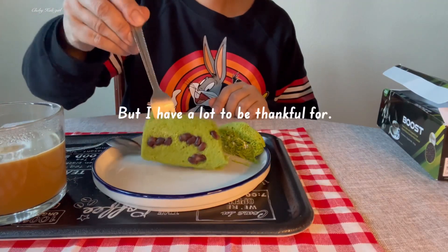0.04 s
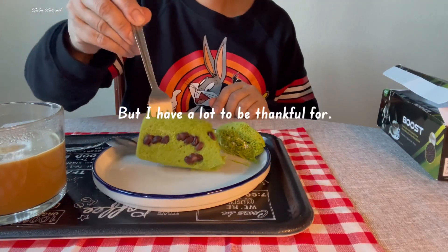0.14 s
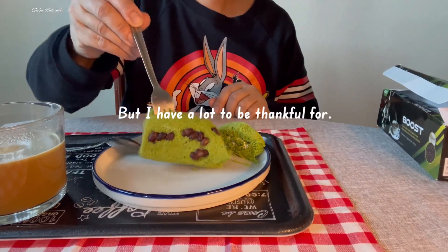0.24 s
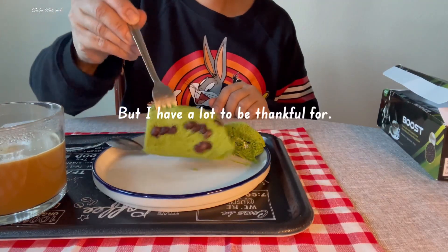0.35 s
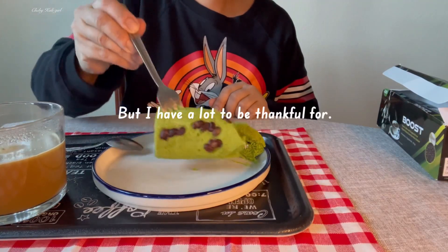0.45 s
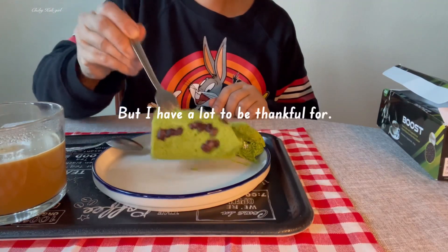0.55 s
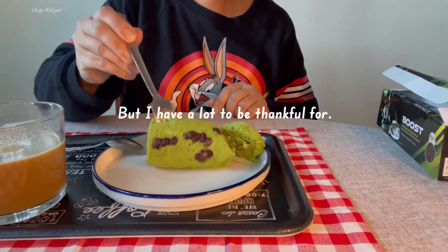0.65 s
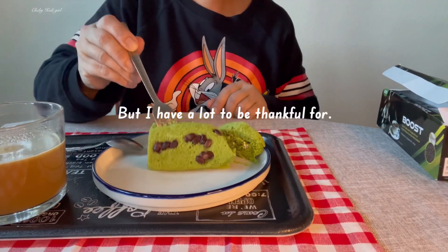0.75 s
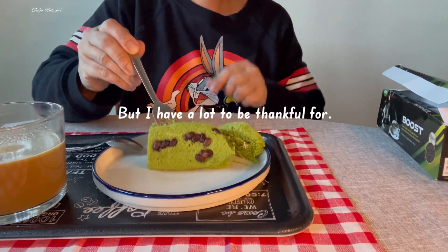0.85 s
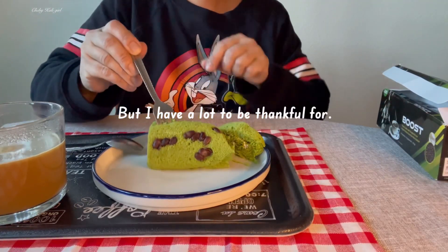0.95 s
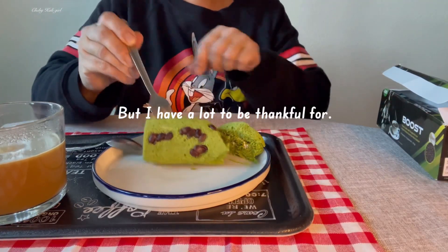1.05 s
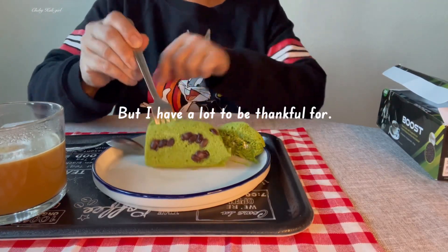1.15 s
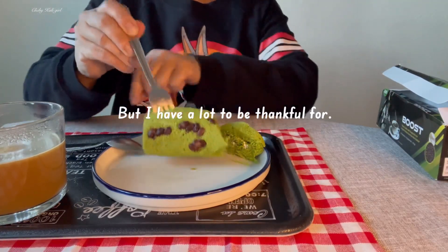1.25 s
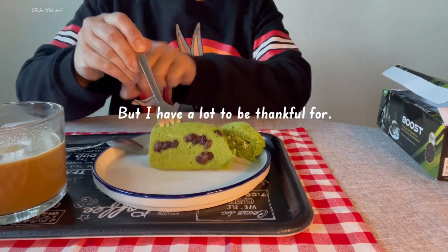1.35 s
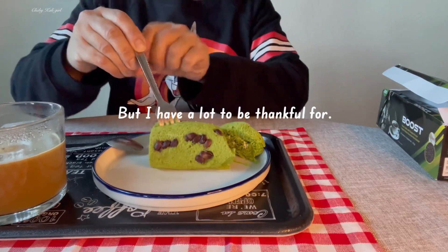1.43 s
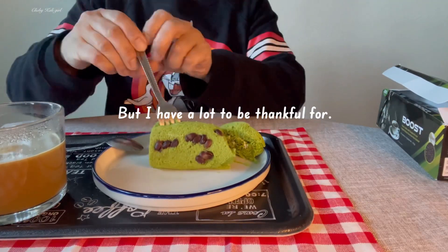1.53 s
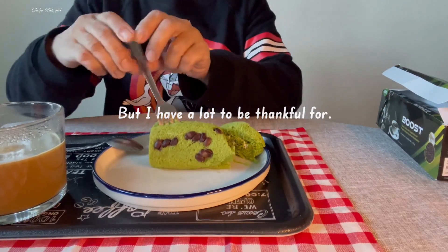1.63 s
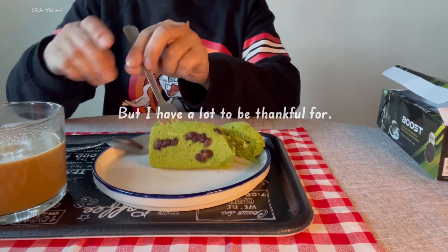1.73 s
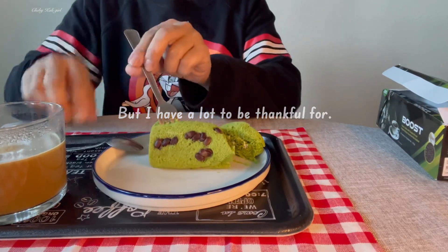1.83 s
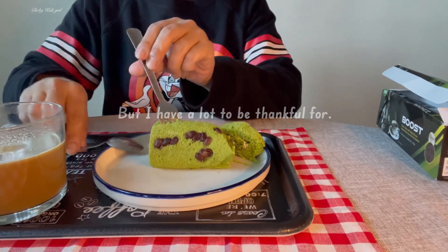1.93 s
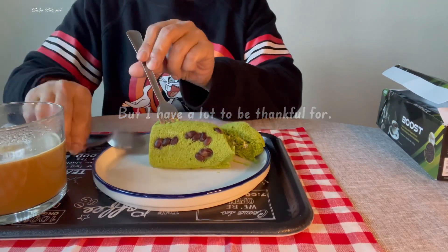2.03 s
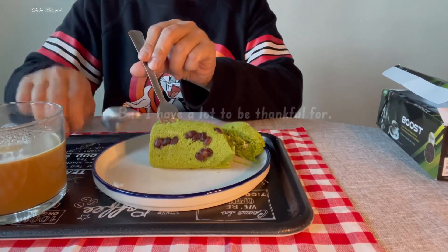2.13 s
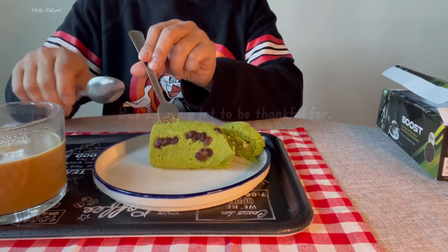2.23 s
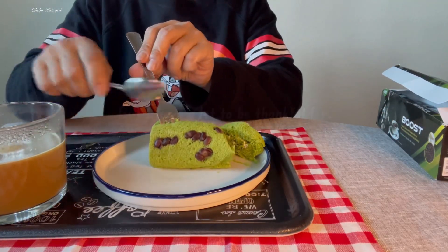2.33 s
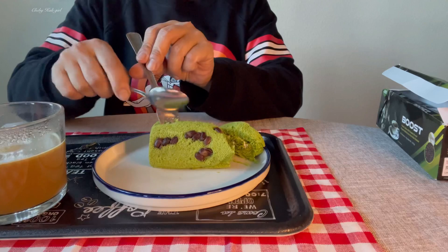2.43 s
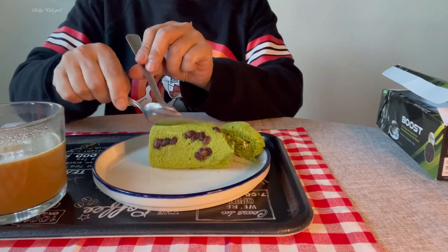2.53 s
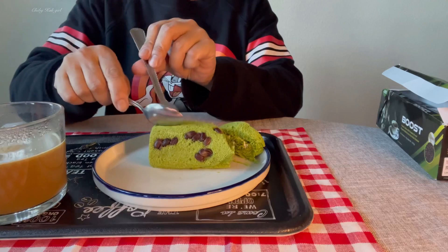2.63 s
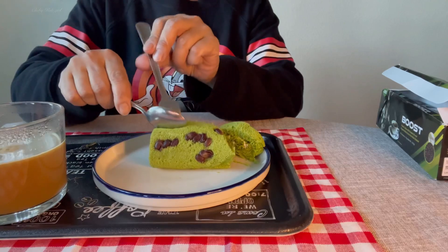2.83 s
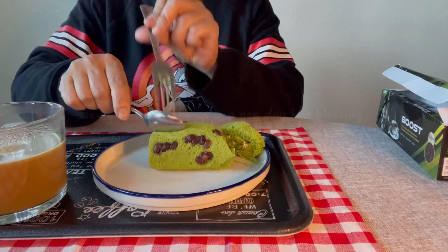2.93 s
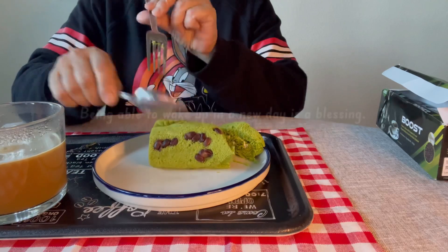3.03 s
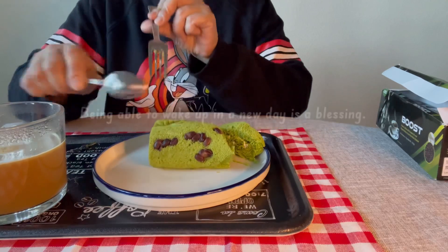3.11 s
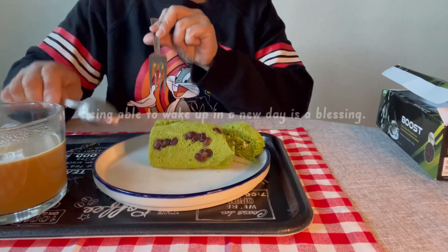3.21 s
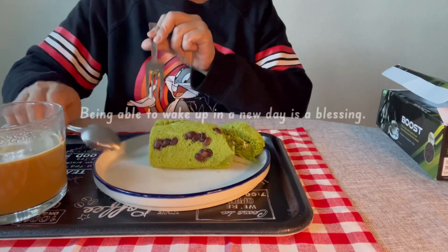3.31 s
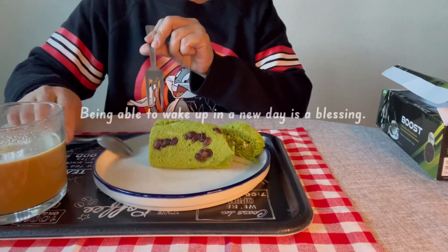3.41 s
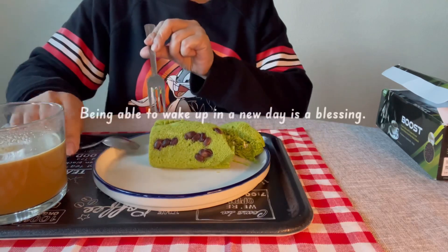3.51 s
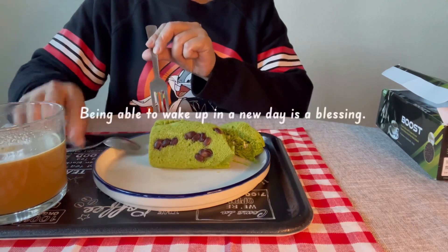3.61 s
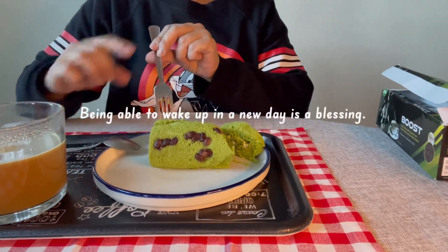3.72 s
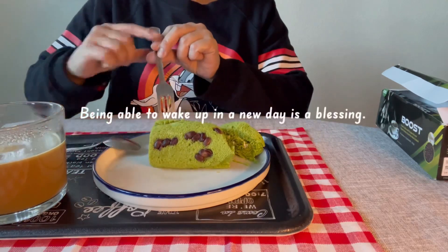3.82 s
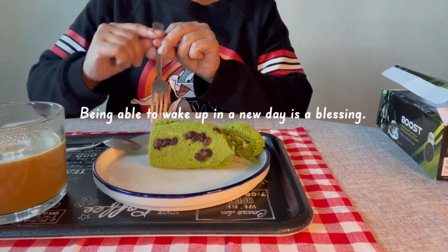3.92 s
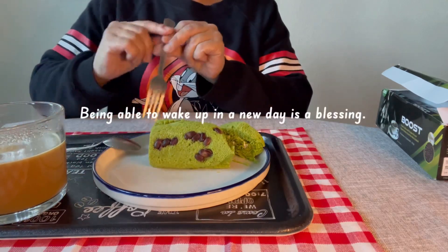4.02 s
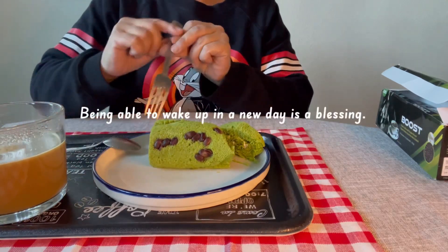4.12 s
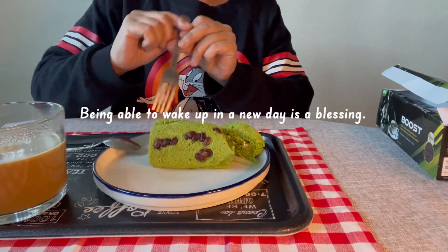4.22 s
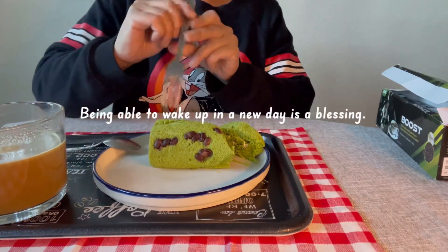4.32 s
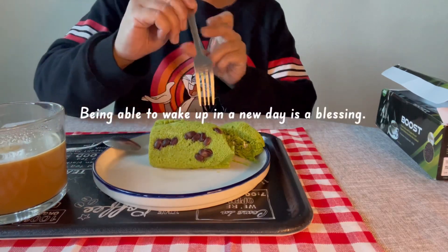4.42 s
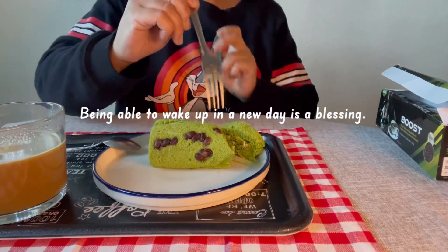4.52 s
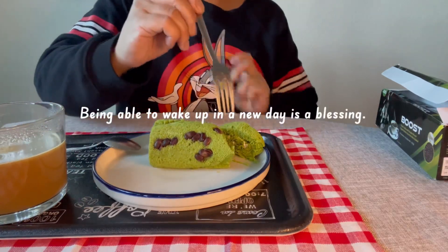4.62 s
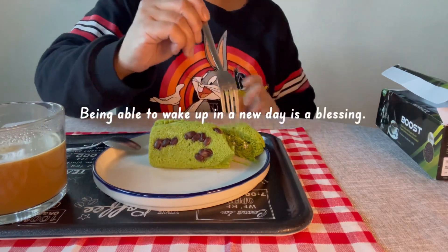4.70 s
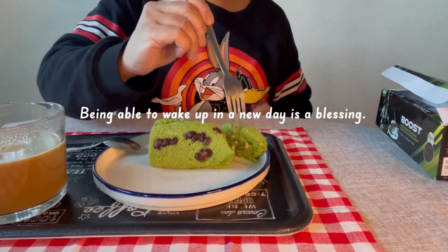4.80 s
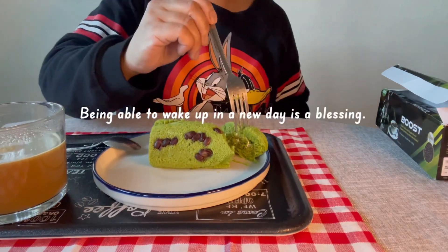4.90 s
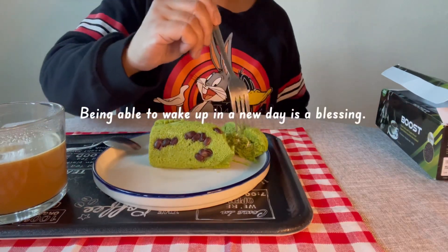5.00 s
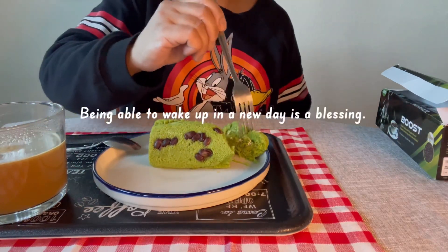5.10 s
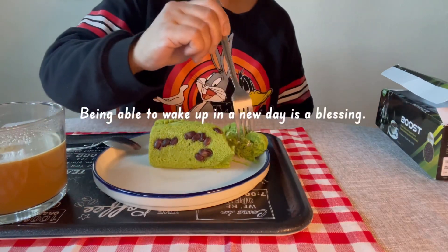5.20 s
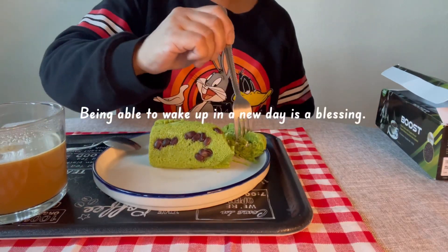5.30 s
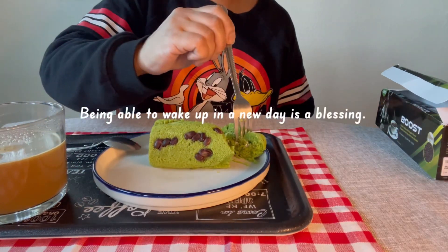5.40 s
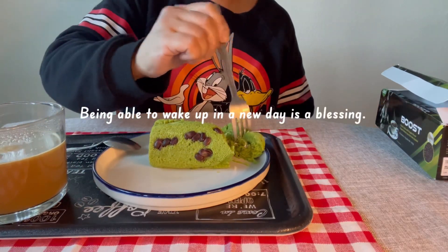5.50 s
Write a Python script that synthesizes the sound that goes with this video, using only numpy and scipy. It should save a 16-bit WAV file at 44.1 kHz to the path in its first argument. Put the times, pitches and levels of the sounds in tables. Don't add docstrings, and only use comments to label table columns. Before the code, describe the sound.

Quiet kitchen hum with light metal taps and scrapes, then a sudden loud clank of spoon on plate, two rebounds, and near silence.

```python
import sys
import numpy as np
from scipy import signal
from scipy.fft import rfft, irfft, next_fast_len
from scipy.io import wavfile
from scipy.ndimage import uniform_filter1d

SR = 44100
rng = np.random.default_rng(int(sys.argv[2]) if len(sys.argv) > 2 else 0)


def to_linear_factor(level_db):
    exponent = np.asarray(level_db, float) / 20
    return 10 ** exponent


def wav_out(sig):
    wavfile.write(sys.argv[1], SR, np.round(np.clip(np.atleast_2d(sig).T, -1, 1) * 32767).astype(np.int16))


N = 244755

# frequency in Hz, density in dB per Hz.
RUMBLE_SPECTRUM = [(13, -49.5), (22, -15.5), (54, -7.5), (70, -6), (86, -21), (102, -3.5), (124, -2),
                   (213, -10), (233, -16.5), (325, -15), (383, -22.5), (413, -20), (432, -35.5), (558, -21),
                   (800, -41), (1040, -70.5), (1760, -120)]
# frequency in Hz, density in dB per Hz.
AIR_SPECTRUM = [(410, -32), (700, -14), (876, 0.5), (1010, -5), (1080, -1.5), (1490, -3), (1630, -8.5),
                (1960, -4), (2130, -9.5), (2520, -9), (5090, -26), (12300, -33.5), (16500, -53.5)]
RUMBLE_LEVEL_DB, AIR_LEVEL_DB = -47, -71
# frequency in Hz, width in Hz, level in dB.
MOTOR_HUM = [(447, 6, -71.5), (1002.2, 19, -73.5), (2005, 43, -80)]
# frequency in Hz, level in dB.
MAINS_HUM = [(59.8, -68), (119.8, -51)]
# frequency in Hz, side minus mid in dB.
HOUSE_WIDTH = [(60, -7.5), (110, -21), (200, -10), (380, -0.5), (700, 5), (1300, 0), (2400, -0.2)]
# frequency in Hz, left minus right in dB.
HOUSE_LEAN = [(60, -1), (110, 0.5), (200, -3), (380, -3.5), (700, -0.5), (1300, 3), (2400, 0.5)]

# band centre in Hz, t60 in seconds.
ROOM_DECAY = [(500, .4), (1200, .42), (2500, .42), (4500, .41), (7500, .34), (11000, .27), (15000, .19)]
ROOM_LEVEL_DB = [-18.5, -28, -17, -18, -15.5, -32.5, -22.5]

# frequency in Hz, density in dB per Hz.
CLOTH_SPECTRUM = [(700, -17), (1500, -6.5), (3000, 2), (6000, -3.5), (9000, 2), (12000, -10.5), (15500, -5),
                  (17000, -21)]
# loudest moment in seconds, level in dB, rise and fall in seconds per 20 dB.
SLEEVE_MOVES = [(1.2, -80, .35, 0.36), (1.3, -76, 0.024, 0.066), (1.43, -78, 0.1, 0.11),
                (1.49, -72, .08, .06), (2.8, -76, .06, 0.21), (2.941, -74, 0.034, 0.15),
                (4.17, -81, .08, 0.79), (5.005, -72, 0.012, 0.081), (5.05, -78, .02, 0.027)]

# start in seconds, peak in dB, frequency in Hz, t60 in seconds.
TABLE_BUMPS = [
    (1.384, -30.5, 46.7, 0.33),
    (2.574, -32, 47, 0.17),
    (3.348, -36.5, 53.8, 0.3),
    (3.468, -45.5, 59, 0.3),
]
# start in seconds, peak in dB, frequency in Hz,
# t60 in seconds.
TRAY_KNOCKS = [(2.424, -42, 458, 0.064), (2.425, -42.5, 883, 0.043), (3.324, -36, 346, 0.024),
               (3.324, -41.5, 636, 0.071), (3.44, -34, 360, 0.033), (3.53, -38, 203, 0.21),
               (3.528, -36, 561, .07), (3.528, -44, 763, 0.075), (3.437, -41.5, 715, 0.037),
               (3.529, -31.5, 1300, 0.079), (3.527, -30, 1492, 0.073)]

# start in seconds, peak in dB, body in Hz, knock and bright tick in dB re the body.
HARD_TAPS = [(0.775, -55.5, 2730, -14, -20),  (1.363, -45, 1590, -8, -25), (1.378, -42, 6500, 16.5, 8.5),
             (1.405, -41.5, 6200, 11.5, -27), (1.435, -48, 2600, 26, -10), (1.949, -48, 9750, -8, -17),
             (1.957, -37, 6400, 7.5, -1), (1.998, -46, 1300, -5, -28), (2.4234, -23, 5550, -2, 6),
             (2.426, -26, 9200, -6, 2), (2.425, -31, 3400, 0.5, 1), (2.9794, -22, 5760, -2, 10),
             (3.324, -6, 6950, -6.5, -7.5), (3.335, -12.5, 3170, -11, -11.5),
             (3.342, -13.5, 5170, -12, -11.5), (3.4395, -6.5, 3098, -2.5, 4.5),
             (3.450, -20.5, 3250, 2.5, -11), (3.5287, -13, 3160, -0.5, -12), (3.536, -26, 3210, 3, -5.5),
             (5.3252, -49, 6500, 2, 4)]
# release in seconds, peak in dB, body in Hz,
# bright tick in dB re the body, swell in ms.
SCRAPES = [(1.992, -43, 2610, -7, 6.7), (2.085, -44, 3550, -13, 3.8), (2.09, -45, 2350, -11, 14),
           (2.094, -39, 3450, -38, 4.4), (2.547, -29, 2970, -12, 1), (2.555, -23, 5720, 5.5, 5.8),
           (2.788, -69, 10800, -25, 3), (2.818, -51.5, 5100, -17, 4.4), (2.838, -60, 5200, -27, 7.6),
           (3.321, -20, 6000, -35, 4.9), (5.012, -52.5, 2100, -12, 9.6)]
TRAY_KNOCK_HZ = 1460
SCRAPE_KNOCK_DB, SCRAPE_KNOCK_DB_PER_OCT = 2.5, -10

# start in seconds, strength of handle, rim, bowl and neck in dB.
PLATE_BLOWS = [
    (2.092, -52, -58, -38, -56),
    (3.3227, 0.5, 1.7, -1.2, -1.6),
    (3.4376, -1, -20, -14.5, -3.5),
    (3.529, -8, -10, -17.5, -12),
]
# pitch of one mode in Hz; most belong to the spoon's handle, but 1190 and 3251 Hz are modes of the
HANDLE_PITCHES = [1190, 1855, 3031, 3251, 3325, 3725, 5267, 7741, 10315, 10485]
# level in dB, t60 in seconds, left
# minus right in dB, phase lead of the left in rad.
HANDLE_MODES = [(-29, 0.1, -1.5, -.3), (-31.5, 0.21, -13.5, 0.2), (-34, .17, -1.8, -1), (-28, .17, -4, 1),
                (-26.5, 0.2, -0.55, -.3), (-41, .14, -8, 0.28), (-36, .21, -0.8, -.3), (-36, 0.22, 6, .1),
                (-26, 0.22, 1.5, .1), (-23.5, .135, -1, .1)]
RIM_PITCHES = [3125, 4414, 6309, 6900, 9068, 11240, 13374]
# level in dB, t60 in seconds, left minus right in dB, phase lead of the left in rad.
RIM_MODES = [(-30.5, .14, -1, -.6), (-38, 0.11, -3, -.4), (-27, 0.15, 6.5, 1.1), (-41.5, .14, -13, -.5),
             (-12, .11, 6.5, .1), (-22.5, 0.082, 4, .1), (-26.5, .11, 0.5, .1)]
BOWL_PITCHES = [2540, 5078, 5900, 6010, 7495]
# level in dB, t60 in seconds, left minus right in dB, phase lead of the left in rad.
BOWL_MODES = [(-35.5, .17, -1, -1), (-22, 0.18, -9, 0.5), (-30, .16, 10.5, -3.5), (-11, 0.12, 2.5, 0.85),
              (-27.5, 0.41, -5, .1)]
NECK_PITCHES = [8260, 9775, 12326, 15325, 15658]
# level in dB, t60 in seconds, left minus right in dB, phase lead of the left in rad.
NECK_MODES = [(-26, 0.18, .1, .1), (-33.5, .15, 21, .1), (-24.5, .12, .1, .1), (-33, .15, .1, .1),
              (-27.5, .17, .5, .1)]
# frequency in Hz, level in dB, t60 in seconds.
SPOON_CLINK = [(1550, -37.5, .02), (3992, -41.5, 0.033), (5001, -37.5, 0.027), (6000, -35.5, 0.016),
               (7745, -44.5, 0.07), (9900, -47, 0.13), (10800, -52.5, 0.079), (13250, -50, .15),
               (15370, -45.5, .1)]
# frequency in Hz, level in dB, t60 in seconds.
FORK_CLINK = [(1190, -43, 0.037), (3310, -51.5, 0.084), (3400, -47, 0.034), (6160, -62, 0.092),
              (6760, -56, 0.046), (6780, -49, 0.024), (7510, -67.5, .1), (9150, -52.5, .05),
              (12340, -64.5, .06)]
SPOON_CLINK_S, FORK_CLINK_S = 2.980, 5.3255
SOFT_FROM_HZ, SOFT_LOSS = 10600, 3.5
MINOR_DB, MINOR_SLOPE, MINOR_T60 = -39, 0.5, .055
RING_SHARE = .8
REST_S, REST_SHARE = 3.5, .62

PORTS_FROM_HZ, PORTS_SAME_HZ, PORTS_TURN_HZ = 6400, 11750, 5400
TOP_HZ = 15950


def shape(x, gain):
    size = next_fast_len(x.shape[-1])
    f = np.arange(size // 2 + 1) * SR / size + 1
    return irfft(rfft(x, size) * gain(f), size)[..., :x.shape[-1]]


def curve(points):
    hz, db = np.transpose(points)
    return lambda f: to_linear_factor(np.interp(np.log(f), np.log(hz), db))


def peak(hz, width):
    return lambda f: 1 / (1 + 1j * (f * f - hz * hz) / (f * width))


def level(x, db):
    return x * to_linear_factor(db) / np.sqrt(np.mean(x ** 2))


def walk(rate):
    hold = int(SR / rate)
    steps = np.repeat(rng.standard_normal(N // hold + 1), hold)
    return uniform_filter1d(uniform_filter1d(steps, hold), hold)[:N]


def add(out, s, x):
    i = int(s * SR)
    out[:, i:i + x.shape[-1]] += x[..., :N - i]


def mode(hz, db, t60, pan_db=0., lead=0., rise=.0006, flutter_db=0.):
    t = np.arange(SR // 2) / SR
    side = np.array([[.5], [-.5]])
    fade = (1 - np.exp(-t / rise)) * np.exp(-np.log(1000) * t / t60)
    rattle = np.interp(t, np.arange(64) * .008, rng.standard_normal(64))
    tone = np.sin(2 * np.pi * (hz * t + rng.random()) + side * lead)
    return to_linear_factor(db + side * pan_db + flutter_db * rattle) * fade * tone


def house():
    mid, side = 0, 0
    for points, db in ((RUMBLE_SPECTRUM, RUMBLE_LEVEL_DB), (AIR_SPECTRUM, AIR_LEVEL_DB)):
        noise = level(shape(rng.standard_normal((2, N)), curve(points)), db)
        noise_mid, noise_side = noise * to_linear_factor(.6 * walk(0.72))
        mid = mid + noise_mid
        side = side + shape(noise_side, curve(HOUSE_WIDTH))
    for hz, width, db in MOTOR_HUM:
        mid = mid + level(shape(rng.standard_normal(N), peak(hz, width)), db)
    for hz, db in MAINS_HUM:
        tone = np.sin(2 * np.pi * hz * np.arange(N) / SR)
        mid = mid + level(tone, db) * to_linear_factor(0.64 * walk(7.6))
    lean = curve(HOUSE_LEAN)
    left = shape(mid + side, lambda f: lean(f) ** .5)
    right = shape(mid - side, lambda f: lean(f) ** -.5)
    return np.array([left, right])


def room(x):
    t = np.arange(int(.8 * SR)) / SR
    tail = 0
    for (hz, t60), db in zip(ROOM_DECAY, ROOM_LEVEL_DB):
        band = shape(rng.standard_normal((2, len(t))), lambda f: peak(hz, .9 * hz)(f) ** 2)
        band = band * np.exp(-np.log(1000) * t / t60)
        tail = tail + to_linear_factor(db) * band / np.sqrt(np.sum(band ** 2) / 2)
    wall = to_linear_factor(4.0) * np.exp(-((t - .012) / .003) ** 2)
    onset = np.clip((t - .002) / 0.015, 0, 1)
    return signal.fftconvolve(x, tail * (onset + wall), axes=1)[:, :N]


def sleeves():
    t = np.arange(N) / SR
    effort = 0
    for s, db, rise, fall in SLEEVE_MOVES:
        effort = effort + to_linear_factor(db + 20 * np.minimum((t - s) / rise, (s - t) / fall))
    hiss = level(shape(rng.standard_normal((2, N)), curve(CLOTH_SPECTRUM)), 0)
    return hiss * effort * to_linear_factor(2 * walk(27))


def table():
    out = np.zeros((2, N))
    for s, db, hz, t60 in TABLE_BUMPS + TRAY_KNOCKS:
        add(out, s, mode(hz, db, t60, rise=0.3 / hz))
    return out


def contact(envelope, db, hz, knock_db, bright_db):
    common, apart = rng.standard_normal((2, len(envelope)))
    grit = envelope * (common + 0.5 * apart * np.array([[1], [-1]]))
    bands = [(hz, 0.38 * hz, 0),
             (TRAY_KNOCK_HZ, 0.82 * TRAY_KNOCK_HZ, knock_db),
             (10000, 10000, bright_db),
             (hz, 1.1 * hz, -9)]
    burst = 0
    for mid, width, gain in bands:
        burst = burst + level(shape(grit, lambda f: peak(mid, width)(f) ** 2), gain)
    burst = shape(burst, lambda f: 1 + 0.2 * np.exp(-2j * np.pi * f * 0.000823))
    return burst * to_linear_factor(db) / np.abs(burst).max()


def cutlery():
    out = np.zeros((2, N))
    ms = np.arange(4096) * 1000 / SR
    tap = np.exp(-ms / 1.9) * np.minimum(ms / 0.12, 1)
    for s, *sound in HARD_TAPS:
        add(out, s, contact(tap, *sound))
    late = ms - 40
    for s, db, hz, bright_db, swell in SCRAPES:
        knock_db = SCRAPE_KNOCK_DB + SCRAPE_KNOCK_DB_PER_OCT * np.log2(hz / 3000)
        scrape = np.exp(np.minimum(late / swell, -late / 1.796))
        add(out, s - .04, contact(scrape, db, hz, knock_db, bright_db))
    return out


def rings():
    out = np.zeros((2, N))
    minor = rng.random(size=(40, 3))
    parts = ((HANDLE_PITCHES, HANDLE_MODES), (RIM_PITCHES, RIM_MODES),
             (BOWL_PITCHES, BOWL_MODES), (NECK_PITCHES, NECK_MODES))
    for s, *strength in PLATE_BLOWS:
        share = RING_SHARE * (REST_SHARE if s > REST_S else 1)
        for (pitches, modes), struck_db in zip(parts, strength):
            for hz, (db, t60, pan_db, lead) in zip(pitches, modes):
                dull_db = SOFT_LOSS * strength[0] * max(np.log2(hz / SOFT_FROM_HZ), 0)
                add(out, s, mode(hz, db + struck_db + dull_db, t60 * share, pan_db, lead, flutter_db=4.0))
        for place, size, lean in minor:
            db = MINOR_DB + MINOR_SLOPE * strength[0] - 12 * size
            add(out, s, mode(1000 * 12 ** place, db, MINOR_T60, 12 * lean - 6, 3 * lean))
    for s, modes in ((SPOON_CLINK_S, SPOON_CLINK), (FORK_CLINK_S, FORK_CLINK)):
        for hz, db, t60 in modes:
            add(out, s, mode(hz, db, t60, flutter_db=4.0))
    return out


def scene():
    ring, crack = rings(), cutlery()
    reflected = room(crack + to_linear_factor(-1.5) * ring)
    return ring + crack + reflected + table() + sleeves() + house()


def band_limit(x):
    return signal.sosfilt(signal.butter(12, 17510, fs=SR, output="sos"), x)


def record(dry):
    size = next_fast_len(N + 4096)
    padded = np.pad(dry, ((0, 0), (0, size - N)), "linear_ramp", end_values=dry[0, 0])
    left, right = rfft(padded)
    f = np.arange(size // 2 + 1) * SR / size
    turn = np.pi * (f - PORTS_SAME_HZ) / PORTS_TURN_HZ
    both = (np.cos(turn) + .11j) * left
    apart = (1j * np.sin(turn) + .11) * right
    high = np.clip((f - PORTS_FROM_HZ) / 500, 0, 1)
    low_part = (1 - high) * np.array([left, right])
    high_part = high * np.array([both + apart, both - apart])
    x = irfft(low_part - high_part, size)
    x = shape(x, lambda f: to_linear_factor(-12 * np.clip((f - TOP_HZ) / 300, 0, 5)))[:, :N]
    mix = np.tanh(0.43 * x) / 0.37
    return band_limit(mix)


dry = scene()
out = record(dry)
wav_out(out)
```